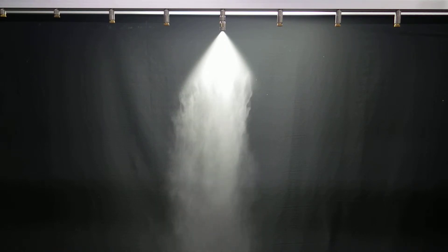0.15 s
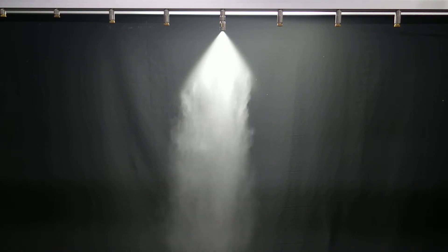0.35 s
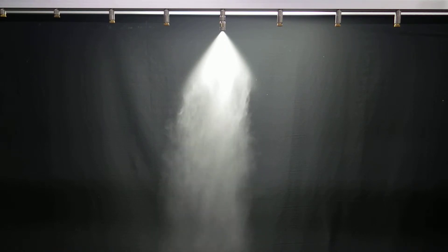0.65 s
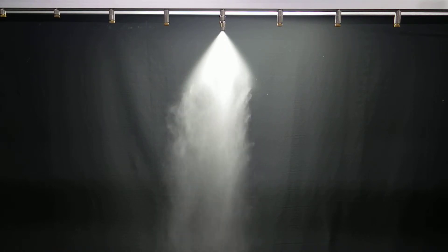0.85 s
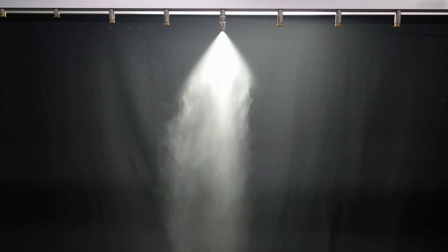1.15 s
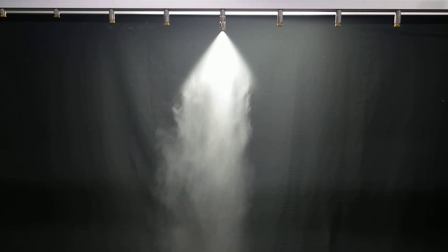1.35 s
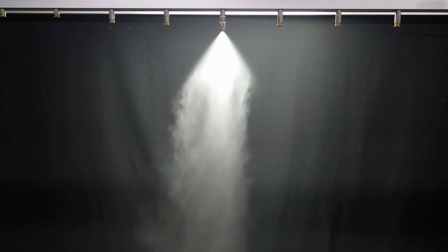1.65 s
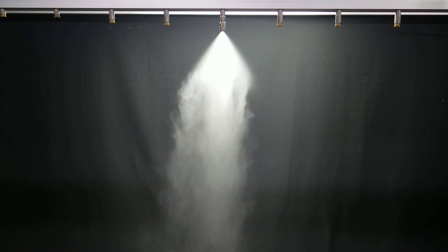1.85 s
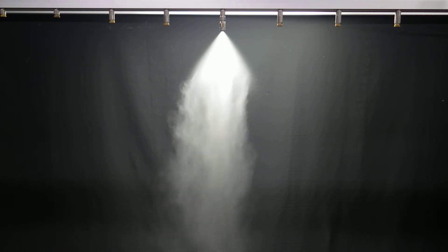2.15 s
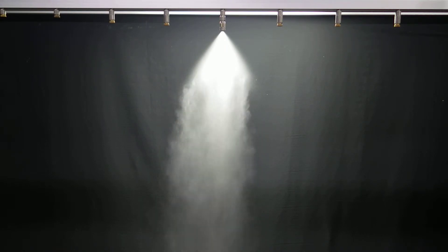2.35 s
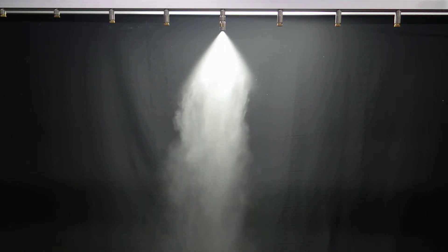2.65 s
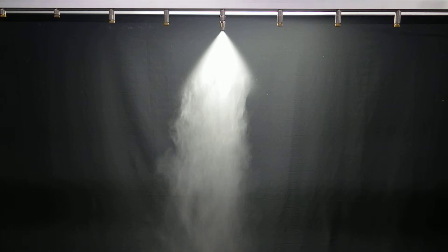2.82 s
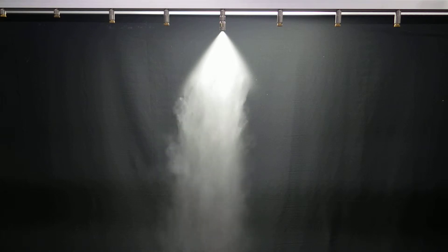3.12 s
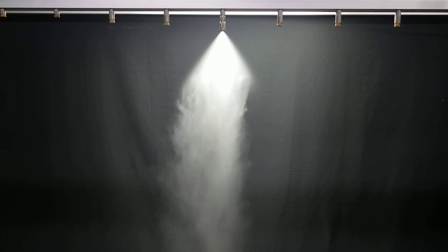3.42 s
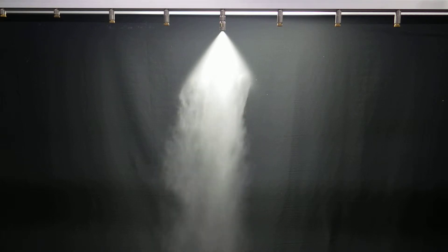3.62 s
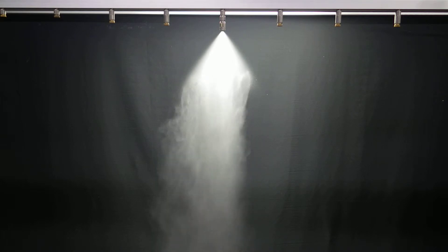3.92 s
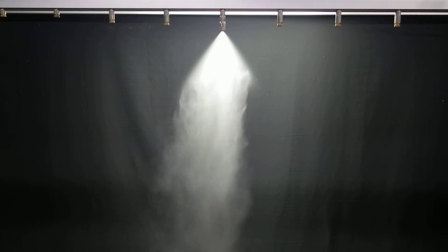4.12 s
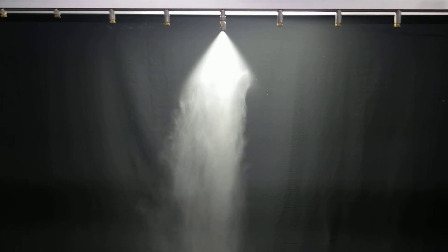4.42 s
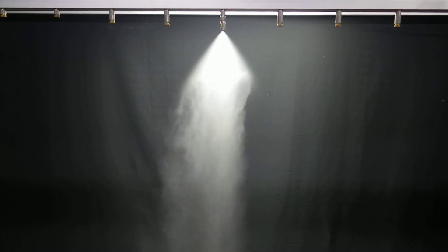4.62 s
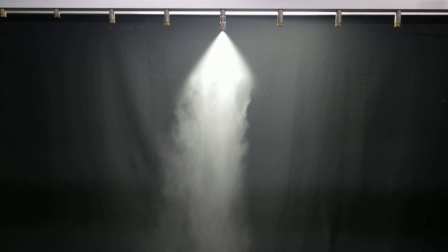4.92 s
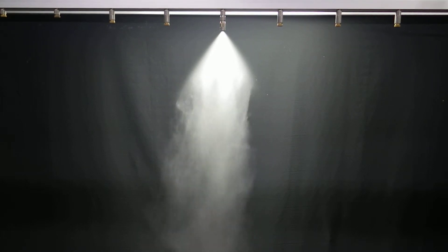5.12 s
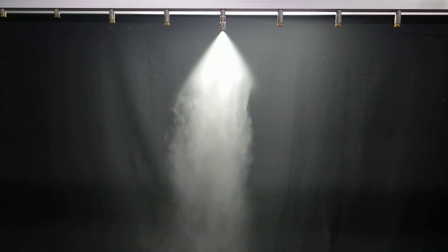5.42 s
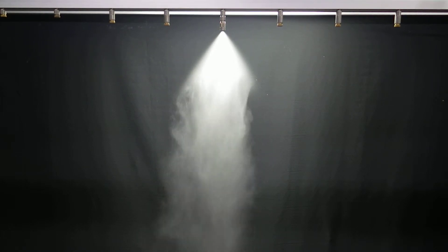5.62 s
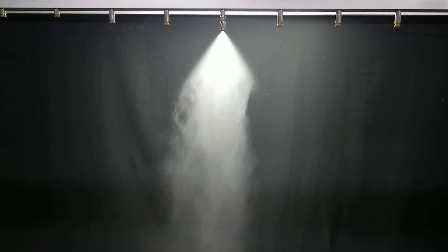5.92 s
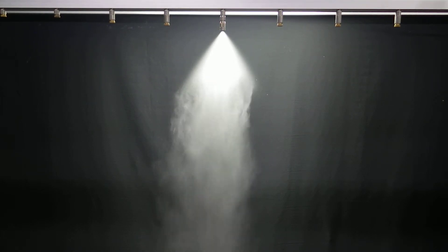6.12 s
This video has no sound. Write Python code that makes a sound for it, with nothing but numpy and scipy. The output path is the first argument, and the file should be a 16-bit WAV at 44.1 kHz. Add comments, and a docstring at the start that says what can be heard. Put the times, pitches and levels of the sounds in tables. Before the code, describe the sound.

From 0 seconds a high-pressure piston pump is already running, holding one steady speed to the end at about 6.4 seconds. It makes a dense, grainy mechanical drone: a fast buzzing rattle strongest around 2 kilohertz, with a low-mid piston tone near 260 hertz and thin, steady whines above. A nozzle adds a fine, airy, continuous hiss of mist, bright but quieter than the pump. Beneath lie a deep fan hum near 57 hertz, faint mains hum and soft room rumble. At about 4.55 seconds several soft contacts, milliseconds apart, merge into one loud, short, hollow knock of the camera stand, mostly stronger on the left, followed by a low shuddering rumble fading within half a second. The pump and hiss duck abruptly, then creep back to full level by roughly 5.5 seconds and continue unchanged. Indoor stereo, no fades.

```python
"""A high-pressure piston pump drones steadily in front of two microphones while its nozzle hisses out fine mist.
Valve spurts shape noise into a rattle, and a waveform repeated every shaft turn makes the tones.
Something bumps the camera's stand: soft contacts ring its low modes as a short hollow knock, and a low rumble
settles after it. The gain control ducks and creeps back up. Fan and mains tones hum below, over low room rumble."""
import sys
import numpy as np
from scipy import signal
from scipy.fft import rfft, irfft, next_fast_len
from scipy.io import wavfile
from scipy.ndimage import uniform_filter1d, minimum_filter1d, map_coordinates

SR = 44100
rng = np.random.default_rng(int(sys.argv[2]) if len(sys.argv) > 2 else 0)


def wrap_up_sound(samples):
    """Save the sound to the file named by the first command line argument, as 16-bit audio."""
    columns = np.atleast_2d(samples).T
    # keep every value between -1 and 1, then stretch to whole-number steps
    tamed = np.clip(columns, -1, 1)
    steps = np.round(tamed * 32767).astype(np.int16)
    wavfile.write(sys.argv[1], SR, steps)


N = 276066  # length in samples

SHAFT_HZ = 29.008  # turns of the pump shaft per second
PISTONS = 3
TOP_HZ = 15200  # upper band limit of the pump tones and of the camera


def amp(db):
    """Decibels to gain."""
    return 10 ** (np.asarray(db) / 20)


def unit(x):
    """Scale to rms 1."""
    return x / np.sqrt(np.mean(x ** 2) + 1e-20)


def along(points, hz):
    """Read (Hz, value) points at any frequency, joined by straight lines on a log axis."""
    point_hz, values = np.transpose(points)
    return np.interp(np.log(hz + 1), np.log(point_hz + 1), values)


def wobble(rate):
    """A smooth random curve through `rate` random knots a second."""
    knots = rng.standard_normal(int(N * rate / SR) + 4)
    return map_coordinates(knots, [np.arange(N) * rate / SR])


def filtered(x, response):
    """Multiply the spectrum of x by a response of frequency."""
    size = next_fast_len(N + SR // 2)  # spare room, so that ringing does not wrap round
    hz = np.fft.rfftfreq(size, 1 / SR)
    return irfft(rfft(x, size) * response(hz), size)[..., :N]


def rush(spectrum, channels):
    """Coloured noise of rms 1, unrelated between channels."""
    noise = rng.standard_normal((channels, N))
    return unit(filtered(noise, lambda hz: amp(along(spectrum, hz))))


def bands(table, hz):
    """Gain of a set of narrow dips or lifts, each reaching its full depth or lift at its centre."""
    gains = []
    for centre, width, db in table:
        away = hz - centre
        gains.append(np.hypot(away, width * amp(db)) / np.hypot(away, width))
    return np.prod(gains, axis=0)


def pump(rattle_db, sway, flutter):
    """An almost even shaft drives gated valve turbulence and tones, heard from one place by two microphones."""
    # sway and flutter scale slow and quick unevenness, in turns
    turns = SHAFT_HZ * np.arange(N) / SR + sway * wobble(0.99) + flutter * wobble(25)
    spurts = rng.standard_normal(N) * valve_gate(turns, depth=0.22, sharpness=2.1, count=9)
    level_db = rattle_db + 0.38 * wobble(14) + 0.041 * wobble(4.7)
    rattle = unit(filtered(spurts, rattle_colour)) * amp(level_db)
    sound = rattle + shaft_tones(turns, rattle_db, scatter_db=3, size=8192)
    return filtered(sound, placement)


def valve_gate(turns, depth, sharpness, count):
    """The valves let `count` spurts through in every turn, each with its own strength."""
    strokes = turns * count
    strength = rng.permutation(np.linspace(0, 1, count)) ** 2
    spurt = np.abs(np.sin(np.pi * strokes)) ** sharpness
    stroke_number = np.floor(strokes).astype(int) % count
    return unit(1 + depth * strength[stroke_number] * spurt)


# Broad colour of the pump's rattle. Each row: frequency in Hz, relative level in dB per Hz.
CASING_COLOUR = [(450, -19), (1000, -13), (1400, -6.5), (1800, 2.5), (2200, -2.5), (2750, -2.5),
                 (3000, -9.5), (3600, -4.5), (3950, -18), (4400, -21.5), (5200, -16.5), (6000, -23),
                 (6800, -20.5), (11500, -58)]
# Narrow hollows shared by rattle and spray. Each row: centre in Hz, half width in Hz, depth in dB.
HOLLOW_BANDS = [(1603, 420, -25), (2070, 338, -26), (3183, 140, -21), (4165, 420, -29), (7861, 70, -8)]
# Thin ringing of the pipework. Each row: centre in Hz, half width in Hz, lift in dB.
PIPE_RINGS = [(2480, 180, 4.5), (2817, 25.4, 3.5), (5370, 30, 0), (6600, 4.6, 14), (7090, 7.4, 14),
              (8190, 170, 8.5)]


def rattle_colour(hz):
    """Gain of the pump's rattle: a broad colour with narrow hollows and the pipework's thin rings."""
    return amp(along(CASING_COLOUR, hz)) * bands(HOLLOW_BANDS, hz) * bands(PIPE_RINGS, hz)


# Share of the rattle that repeats every turn. Each row: frequency in Hz, level in dB against the random part.
REPEATING_SHARE = [(300, -1), (500, -1), (850, 5), (1700, -2), (3500, -4), (5000, -2), (7000, -4),
                   (12000, -10)]
# Piston-beat harmonics that the pump's body sings along with, ahead of the placement between microphones.
# Each row: harmonic of the piston beat, level in dB rms.
SINGING_HARMONICS = [(2, -45), (3, -33), (6, -48), (7, -42), (8, -43.6), (12, -38), (13, -43), (22, -44),
                     (28, -40), (30, -43.6)]
# Beat harmonics that swell once a turn, adding a whining pair one shaft speed to either side.
# Each row: harmonic of the piston beat, level of each of the pair in dB rms ahead of the placement.
SPLIT_HARMONICS = [(6, -53), (13, -48.5), (20, -41.5), (28, -36.8), (30, -37.3), (32, -39.8)]
# Lone whistles of the drive. Each row: multiple of the shaft speed, level in dB rms ahead of the placement.
DRIVE_WHISTLES = [(79, -34.7), (115, -50), (127, -47.5), (165, -55.4), (230, -54.7)]
BEAT_DB, BEAT_TOP_HZ = -54, 1200  # each plain beat harmonic in dB rms, and where they fall away
SIDEBAND_LOSS_DB = 14.5  # from each sideband to the next one out


def shaft_tones(turns, rattle_db, scatter_db, size):
    """Whatever repeats each turn is a set of shaft harmonics: weak comb, piston beat, sidebands, whistles."""
    orders = np.arange(size // 2 + 1)
    hz = orders * SHAFT_HZ
    colour = rattle_colour(hz) / np.linalg.norm(rattle_colour(hz))
    comb_db = rattle_db + along(REPEATING_SHARE, hz) + scatter_db * rng.standard_normal(len(hz))
    comb = colour * amp(comb_db)
    beat = (orders % PISTONS == 0) * amp(BEAT_DB) / (1 + (hz / BEAT_TOP_HZ) ** 10)
    sidebands = []
    for harmonic, db in SPLIT_HARMONICS:
        steps_from_pair = np.abs(np.abs(orders - PISTONS * harmonic) - 1)
        sidebands.append(amp(db - SIDEBAND_LOSS_DB * steps_from_pair))
    # the loudest claim on each harmonic wins
    level = np.max([comb, beat, *sidebands], axis=0) * (hz > 0) * (hz < TOP_HZ)
    for harmonic, db in SINGING_HARMONICS:
        level[PISTONS * harmonic] = amp(db)
    for order, db in DRIVE_WHISTLES:
        level[order] = amp(db)
    phases = np.exp(2j * np.pi * rng.random(len(hz)))
    one_turn = irfft(level * phases) * size / np.sqrt(2)  # makes each level an rms
    return map_coordinates(one_turn, [turns % 1 * size], mode="grid-wrap")


# The pump's place between the microphones. Each row: frequency in Hz, left minus right in dB.
SIDE_BALANCE = [(2300, 0), (2700, -2), (2880, 8.5), (3050, -8.5), (3350, 4.5), (3700, 9.5), (4000, -24),
                (4400, 12.5), (5200, -4.5), (5800, -7), (6500, -2.5), (7100, -0.5), (8000, -1), (8500, 7)]
# The pump reaches one microphone slightly earlier. Each row: frequency in Hz, lead of the left in radians.
LEFT_LEAD = [(120, 0), (260, .12), (900, 0.0064), (2200, 0), (2500, 0.091), (3500, 0.29), (5000, .3),
             (7400, .1)]


def placement(hz):
    """Level and phase of the pump at the left and right microphones, half the difference on each."""
    half = np.array([[.5], [-.5]])
    return amp(half * along(SIDE_BALANCE, hz)) * np.exp(1j * half * along(LEFT_LEAD, hz))


# Colour of the spray. Each row: frequency in Hz, relative level in dB per Hz.
SPRAY_COLOUR = [(1000, -89), (4200, -13), (6000, 3), (8500, -0.5), (10200, 0), (12000, -2.5), (15000, -4.5)]


def mist(hiss_db, flicker_db):
    """The atomising jet: a wide, fine hiss with the same hollows as the rattle."""
    hiss = filtered(rush(SPRAY_COLOUR, channels=2), lambda hz: bands(HOLLOW_BANDS, hz))
    return amp(hiss_db + flicker_db * wobble(18)) * hiss


# Contacts of the bump. Each row: start in seconds, level in dB.
BUMP_CONTACTS = [(4.5464, -9), (4.549, -3.5), (4.561, 1)]
# Ringing modes of the stand. Each row: frequency in Hz, level in dB on top of the contact's,
# time to fall by 60 dB in seconds, left minus right in dB.
STAND_MODES = [(57.1, -16, 0.77, -2), (73, -0.5, 0.19, 1), (115, -18, .08, 5), (167, -9.5, 0.056, 10.5),
               (227, -6, 0.13, 11.5), (259.4, .5, 0.17, 6.5), (280, -14.5, 0.23, -8), (377, -11.5, 0.11, 7),
               (430, -8, 0.04, 7)]


def bump(attack):
    """Soft contacts in quick succession ring the stand's low modes, mostly stronger at the left microphone."""
    knock = np.zeros((2, N))
    for start, contact_db in BUMP_CONTACTS:
        t = np.maximum(np.arange(N) / SR - start, 0)
        onset = amp(contact_db) * (1 - np.exp(-t / attack))
        for hz, level_db, t60, left_db in STAND_MODES:
            ring = onset * amp(level_db - 60 * t / t60) * np.sin(2 * np.pi * hz * t)
            knock += ring * amp([[left_db / 2], [-left_db / 2]])
    return knock


def shudder(db, rise, t60, side_db):
    """From the last contact the stand settles with an uneven low rumble, a little different at each microphone."""
    t = np.maximum(np.arange(N) / SR - BUMP_CONTACTS[-1][0], 0)
    # Each row: frequency in Hz, relative level in dB per Hz.
    colour = [(10, -40), (35, 1), (70, 0), (115, -6), (170, -32), (400, -70)]
    rumble = rush(colour, channels=1) + amp(side_db) * rush(colour, channels=2)
    return rumble * amp(db - 60 * t / t60) * (1 - np.exp(-t / rise))


# Fan and mains tones. Each row: frequency in Hz, level in dB rms about which it wavers.
HUM_TONES = [(37.7, -57), (47.4, -44), (57, -24.5), (85.5, -51.5), (120, -40), (142.3, -51.5), (240, -43),
             (360, -55.5), (600, -53.5)]


def hum(waver_db):
    """Fan and mains are steady sine tones, each wavering a little in level, alike at both microphones."""
    t = np.arange(N) / SR
    total = np.zeros(N)
    for hz, db in HUM_TONES:
        level = np.sqrt(2) * amp(db + waver_db * wobble(6.6))
        total += level * np.sin(2 * np.pi * (hz * t + rng.random()))
    return total


# Colour of the room's air rumble. Each row: frequency in Hz, relative level in dB per Hz.
RUMBLE_COLOUR = [(8, -31), (22, -13), (38, 1), (56, -4), (70, -7.5), (95, -11.5), (160, -11.5), (270, -14),
                 (420, -24), (900, -56)]


def air(rumble_db, side_db):
    """Low rumble of the room: shared noise plus a weaker part that differs between the microphones."""
    shared = rush(RUMBLE_COLOUR, channels=1)
    separate = amp(side_db) * rush(RUMBLE_COLOUR, channels=2)
    return amp(rumble_db) * (shared + separate)


def gain_control(x, ceiling_db, attack, recovery_db):
    """Peaks over the ceiling pull the gain down; it returns by recovery_db each second."""
    peak_db = 20 * np.log10(np.abs(x).max(axis=0) + 1e-9)
    over = np.maximum(peak_db - ceiling_db, 0)
    ramp = recovery_db * np.arange(N) / SR
    held = np.maximum.accumulate(over + ramp) - ramp  # a peak hold that sinks along the ramp
    held = np.maximum(held, 0)
    keep = np.exp(-1 / (attack * SR))
    reduction_db = signal.lfilter([1 - keep], [1, -keep], held)
    return x * amp(-reduction_db)


def limiter(x, top, size):
    """A fast look-ahead limiter rounds off what the gain control is too slow for."""
    needed = top / np.maximum(np.abs(x).max(axis=0), top)
    lowest = minimum_filter1d(needed, 2 * size)  # size in samples
    return x * uniform_filter1d(lowest, size)


def scene():
    """Pump, spray, hum and room air, with one bump of the stand; levels in dB, times in seconds."""
    machine = pump(rattle_db=-30.0, sway=0.0016, flutter=0.00031) + hum(waver_db=.5)
    room = air(rumble_db=-35, side_db=-15)
    knock = bump(attack=0.0023) + shudder(db=-5.5, rise=0.025, t60=0.65, side_db=-10)
    return machine + room + mist(hiss_db=-46.5, flicker_db=0.5) + knock


def record(dry):
    """The camera rides its gain, limits peaks and keeps nothing above its band limit."""
    ducked = gain_control(dry, ceiling_db=-5.0, attack=0.0063, recovery_db=12.0)
    limited = limiter(ducked, top=.83, size=128)
    return filtered(limited, lambda hz: hz < TOP_HZ)


dry = scene()
out = record(dry)
wrap_up_sound(out)
```